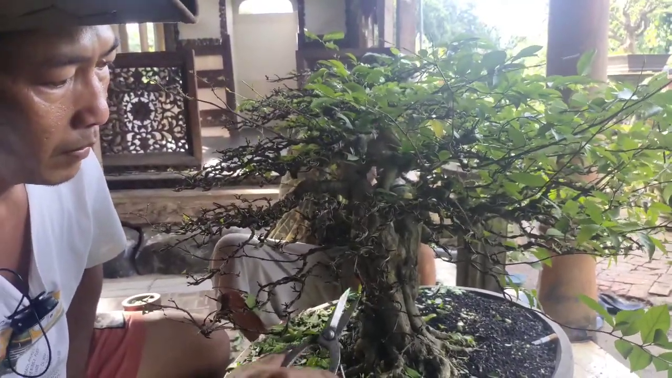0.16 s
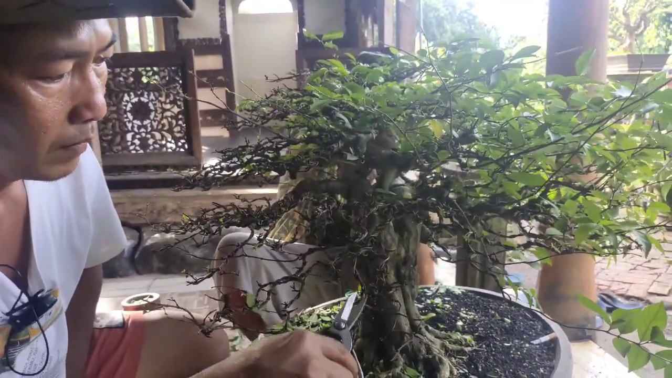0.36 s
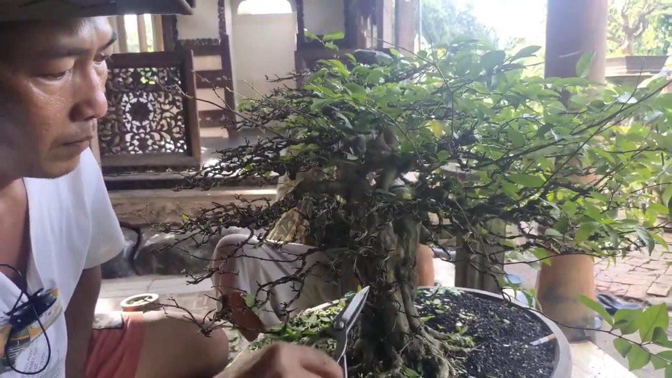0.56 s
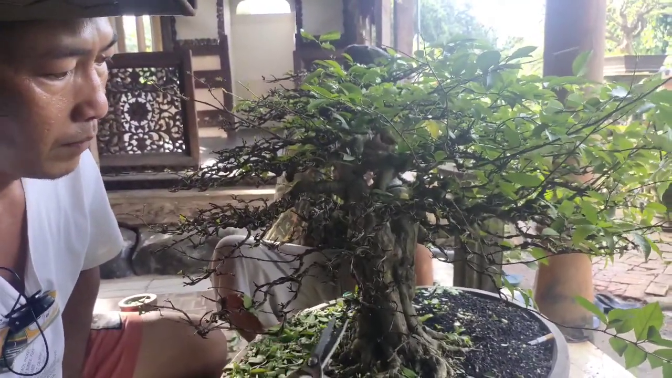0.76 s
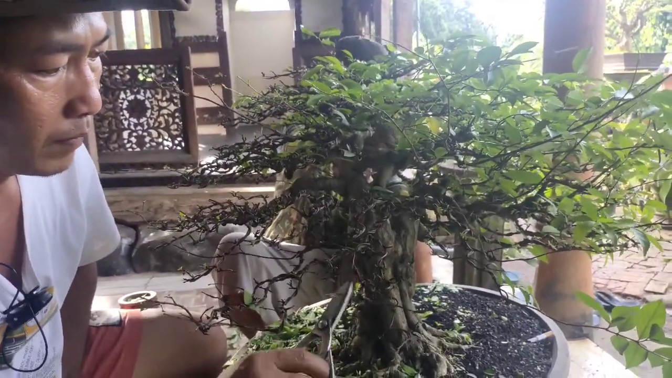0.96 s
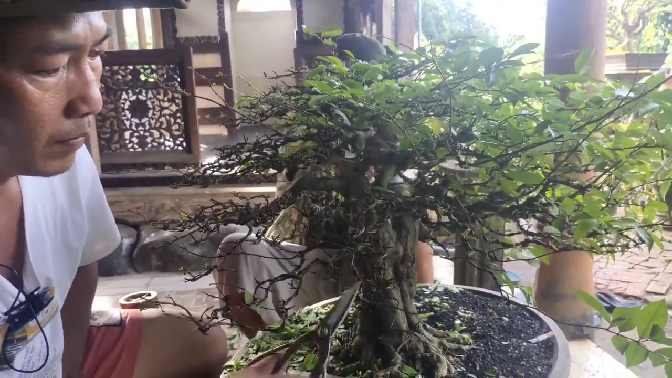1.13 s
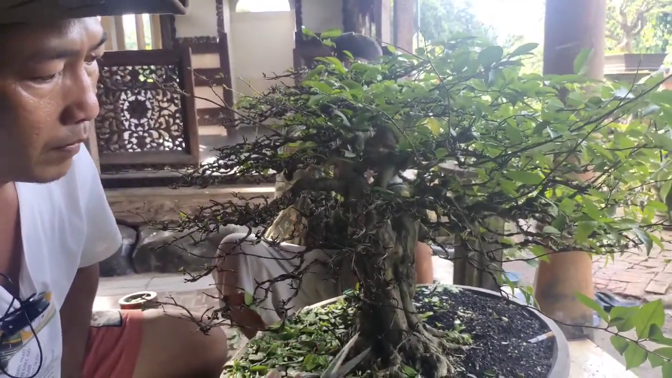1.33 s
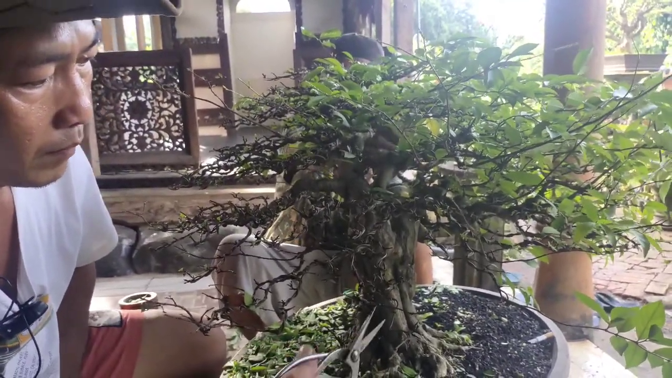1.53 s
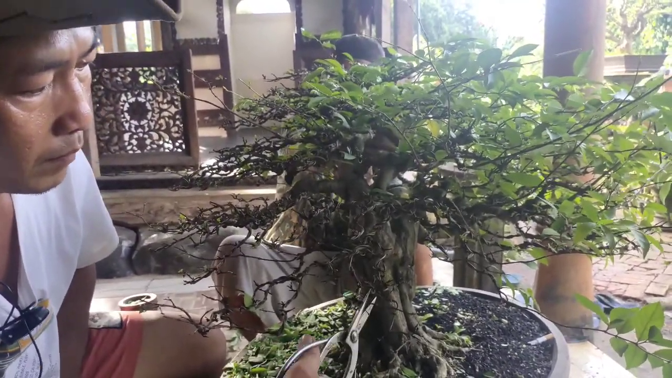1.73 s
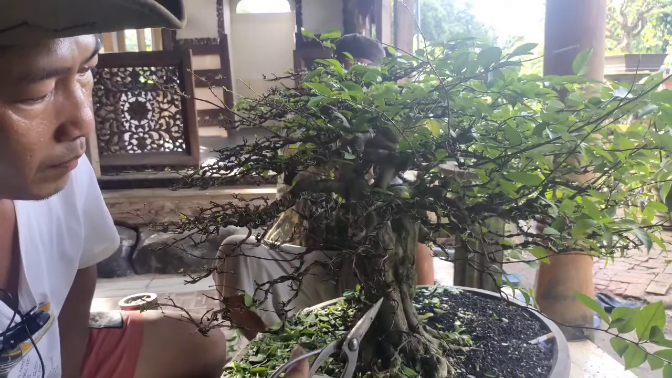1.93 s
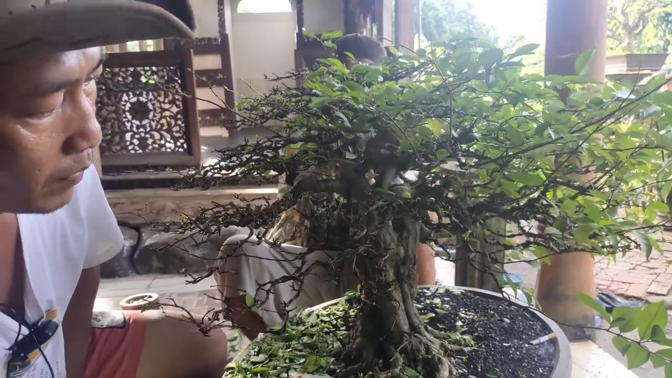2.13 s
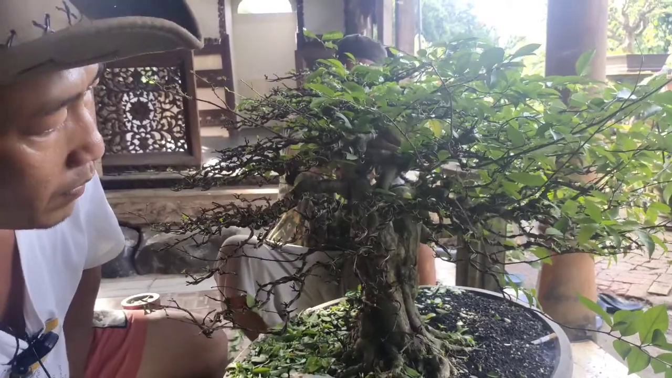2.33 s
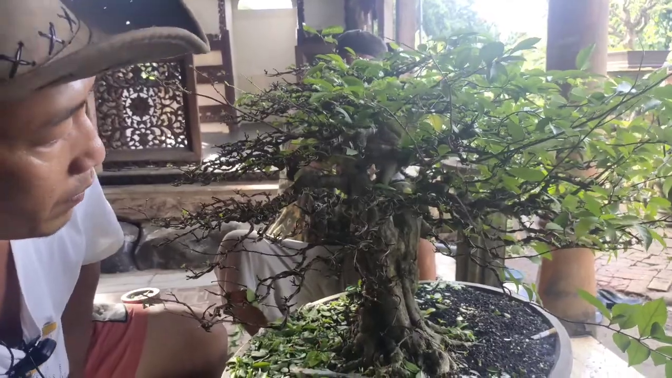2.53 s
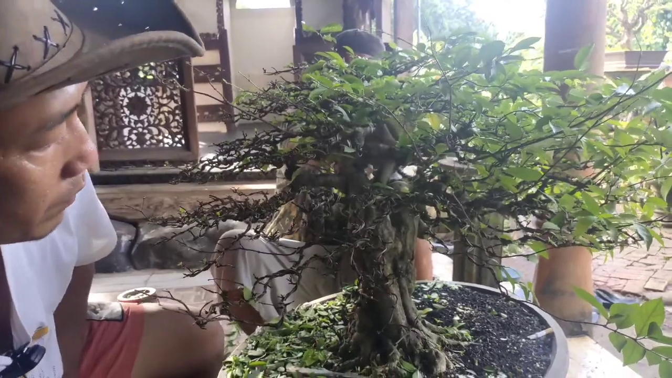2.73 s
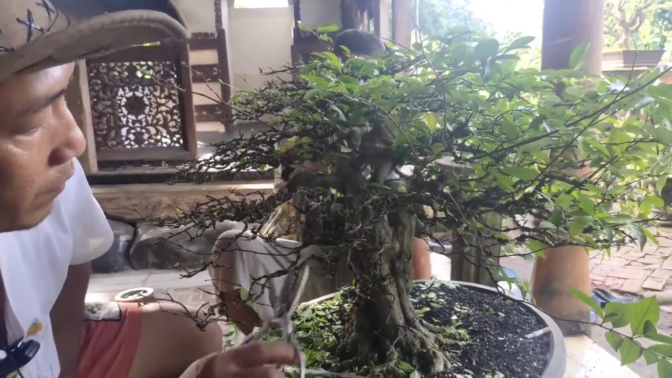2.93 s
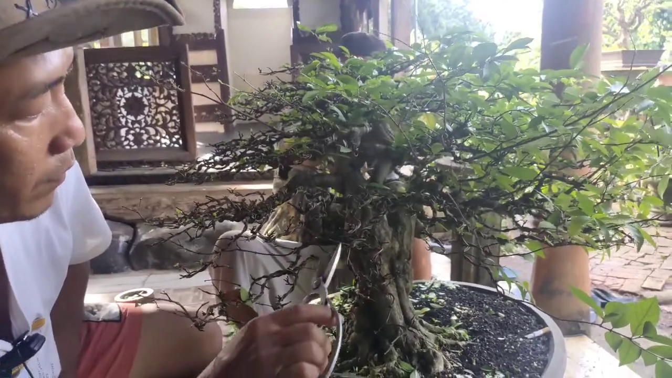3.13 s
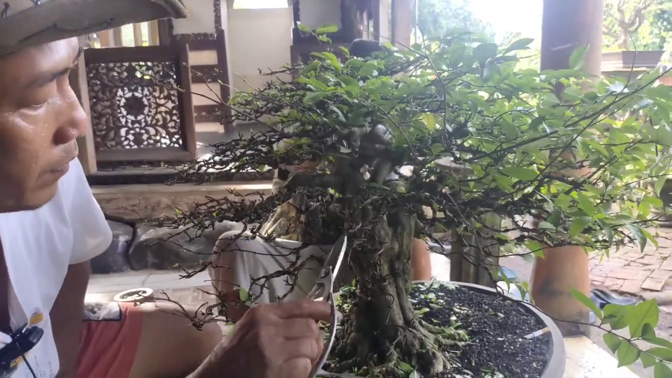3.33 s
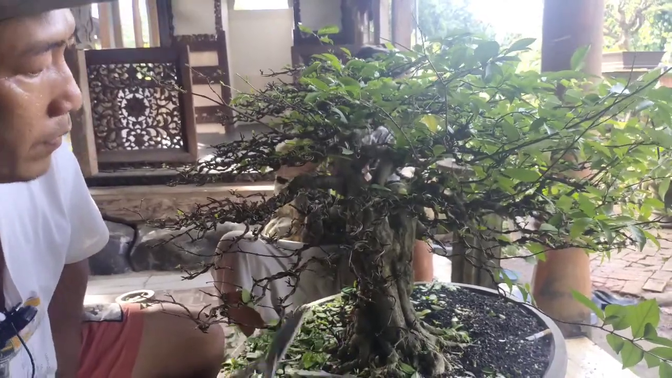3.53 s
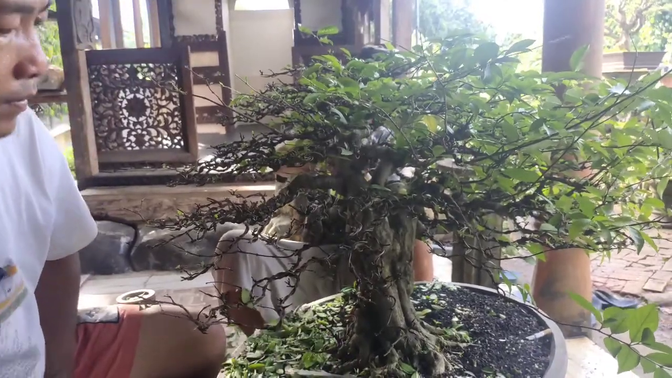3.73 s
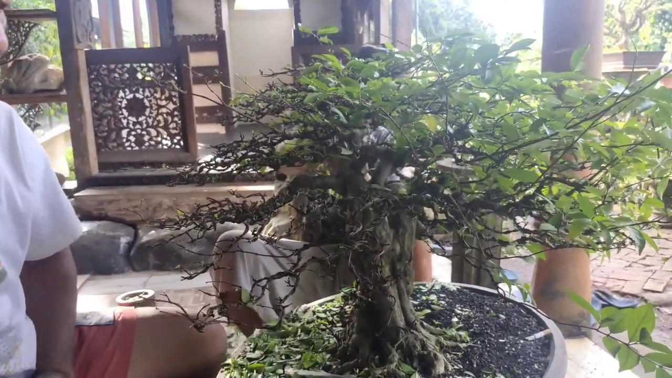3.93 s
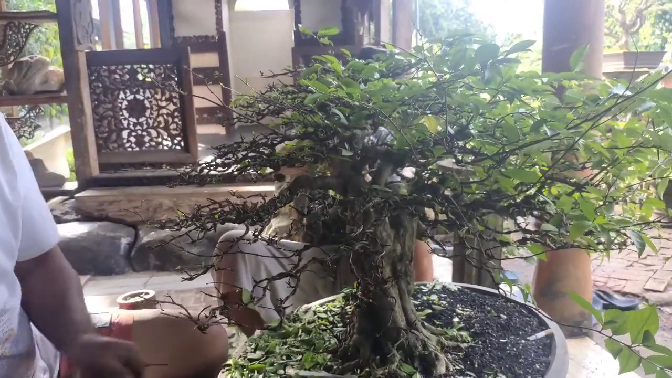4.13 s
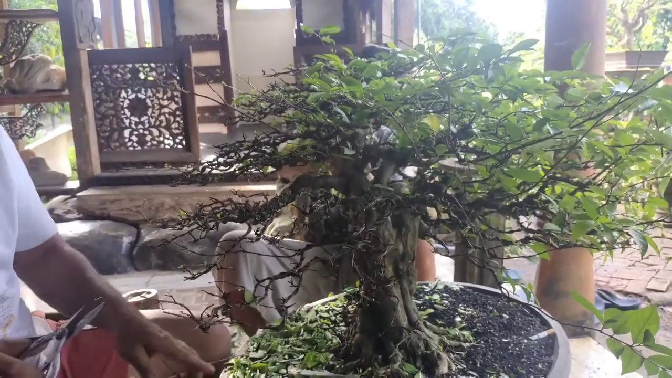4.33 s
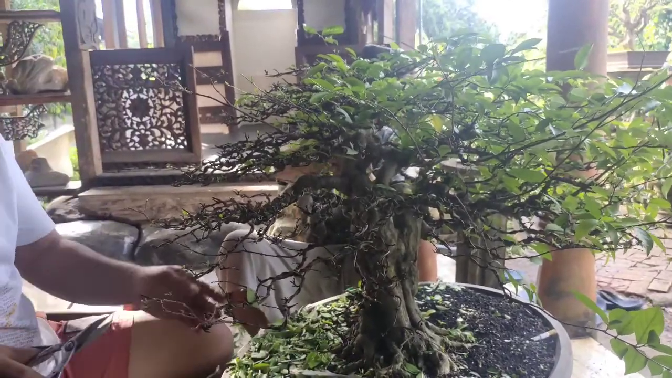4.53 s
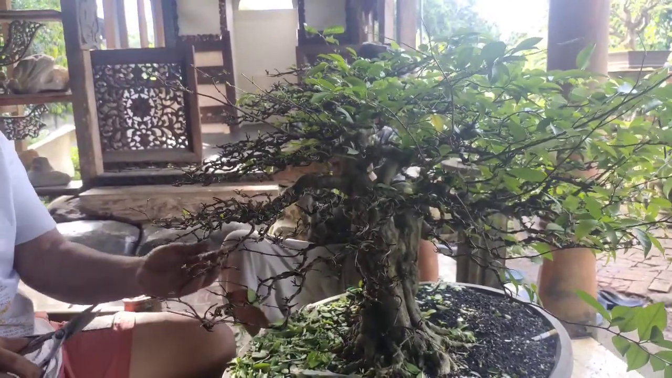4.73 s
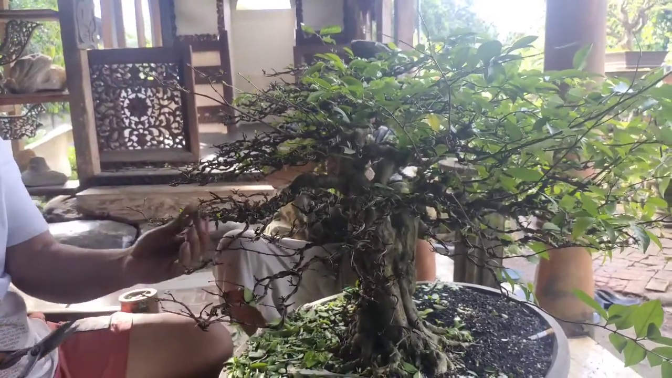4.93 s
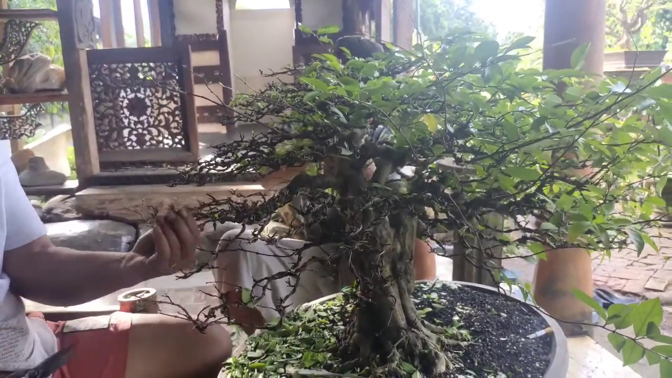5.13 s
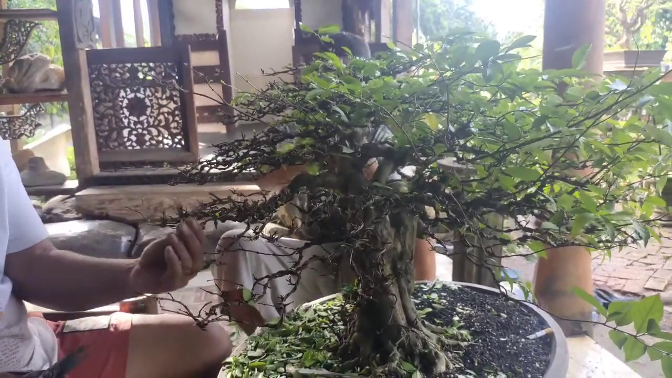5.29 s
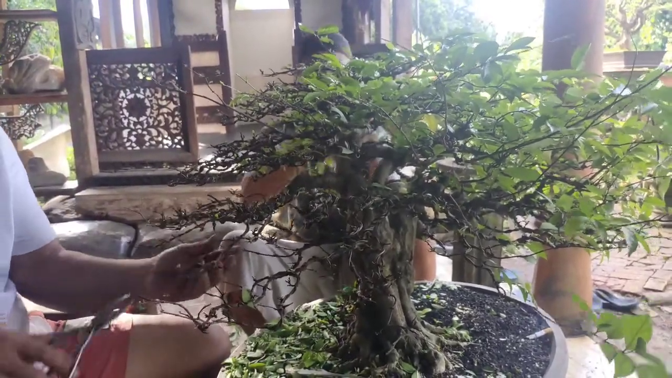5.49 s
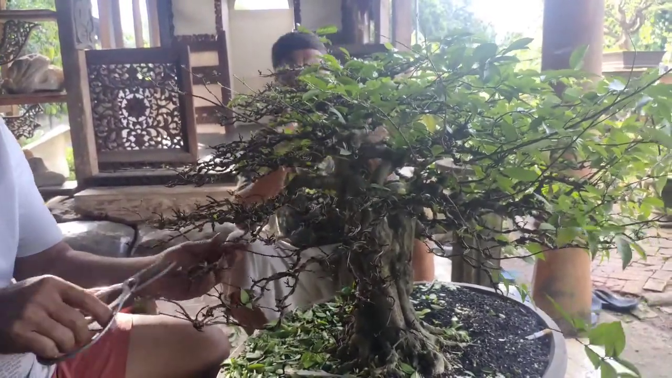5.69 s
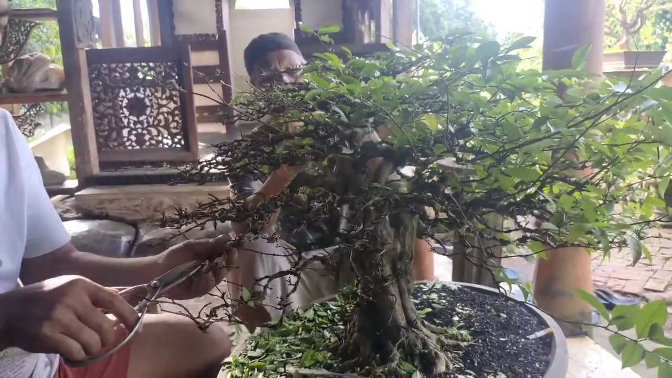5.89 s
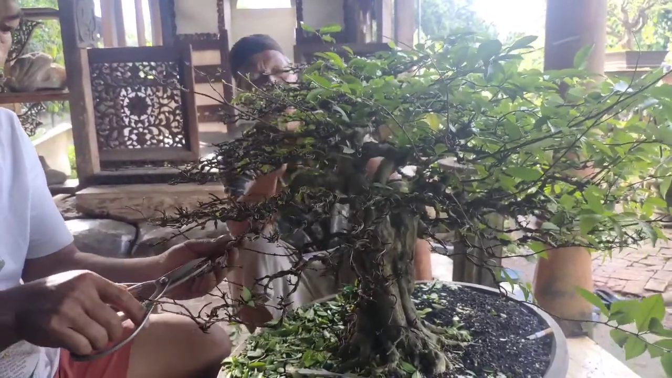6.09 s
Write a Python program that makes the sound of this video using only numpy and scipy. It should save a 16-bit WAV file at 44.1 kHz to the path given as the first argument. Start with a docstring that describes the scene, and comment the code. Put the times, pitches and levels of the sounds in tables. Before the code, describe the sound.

Five sharp metallic scissor snips at irregular gaps, small twig cracks and leaf ticks between, over a distant idling engine that fades into a swelling road rush.

```python
"""The end of a cut rings out at once, then steel scissors snip on at a small potted tree on a tiled veranda.
The microphone is close. Each cut is a noisy crack of wood, a grind of the edges and a few damped blade tones.
Twigs and leaves tick in short noise bursts between the cuts; soft bumps and faint high spots are noise swells.
Far off an engine, made of firing pulses, idles and fades; the street hums in drifting noise bands,
and the tyre noise of a vehicle slowly draws near. A noise suppressor and a dull microphone take it all in."""
import sys
import numpy as np
from scipy import signal
from scipy.fft import rfft, irfft
from scipy.io import wavfile
from scipy.ndimage import uniform_filter1d

SR = 44100
rng = np.random.default_rng(int(sys.argv[2]) if len(sys.argv) > 2 else 0)


def generate_wav(signal):
    """Clip the signal to [-1, 1] and save it as 16-bit WAV at the path in sys.argv[1]."""
    frames = np.transpose(np.atleast_2d(signal))
    scaled = np.clip(frames, -1, 1) * 32767
    pcm = np.round(scaled).astype(np.int16)
    wavfile.write(sys.argv[1], SR, pcm)


N = 275665
TIME = np.arange(N) / SR


def gain_of(db):
    """Decibels to amplitude."""
    return 10 ** (np.asarray(db) / 20)


def evened(x):
    """Scales to rms 1."""
    return x / np.sqrt(np.mean(x ** 2) + 1e-20)


def with_energy(x, seconds):
    """Gives a short sound the energy of a steady sound of rms 1 lasting that many seconds."""
    return x * np.sqrt(seconds * SR) / np.linalg.norm(x)


def read(points, hz):
    """Reads a spectrum on a log-frequency axis."""
    point_hz, value = np.transpose(points)
    return np.interp(np.log(hz + 1), np.log(point_hz + 1), value)


def curve(rows):
    """Reads a time curve at every sample."""
    return np.interp(TIME, *np.transpose(rows))


def add(mix, s, sound):
    """Mixes a sound in at time s, which may lie before zero."""
    start = round(s * SR)
    sound = sound[max(-start, 0):]
    part = mix[max(start, 0):][:len(sound)]
    part += sound[:len(part)]


def colour(x, points):
    """Gives a steady sound a spectrum."""
    hz = np.fft.rfftfreq(len(x), 1 / SR)
    return irfft(rfft(x) * gain_of(read(points, hz)), len(x))


def causal(x, points, size=2048):
    """Gives a click a spectrum by a minimum-phase filter, without blurring its attack."""
    hz = abs(np.fft.fftfreq(size, 1 / SR))
    log_gain = np.log(gain_of(read(points, hz)))
    taps = np.fft.ifft(np.exp(np.conj(signal.hilbert(log_gain)))).real
    return signal.fftconvolve(x, taps[:size // 2])[:len(x)]


def snips():
    """In every cut the edges bite the bark just before the blades meet."""
    # The blades meet. Each row: start in seconds, level in dB, room level in dB that each part shifts,
    # crack of the wood in dB against the cut's level.
    cuts = [(-.03, -17, 5, -22.5), (0.3421, -34, 12, -17), (.5513, -40, 15, -31.5),
            (0.584, -16.5, 2.5, -24.5), (1.1119, -13, 2.5, -25.5), (1.557, -50, 7, -33),
            (1.842, -52.5, 1, -27), (1.969, -10.5, 1.5, -29), (3.4394, -13.5, 3.5, -21.5),
            (4.5904, -53, 9.5, 9.5)]
    bite_ahead_s, bite_db = 0.004, -40.5  # bite level against the cut's level
    out = np.zeros(N)
    for s, db, room_db, crack_db in cuts:
        bite = twig(db + bite_db, treble_db=9.5, decay=.003, room_db=2.0)
        add(out, s - bite_ahead_s, bite)
        add(out, s, snip(db, room_db, crack_db))
    return out


def snip(db, room_db, crack_db, rise=0.00023, span=0.0014):
    """The twig parts, the edges grind and the blades ring for a few milliseconds."""
    # Steel blades, damped by the hand. Each row: pitch in Hz, relative level in dB, decay t60 in seconds.
    blades = [(3330, -17, .012), (4040, -15, .015), (4480, -17, .014), (4880, -18, .015), (5440, -4, .013),
              (6200, -5, .011), (6620, -4, .010), (7000, 0, .012)]
    # The edges grind past each other. Each row: frequency in Hz, relative level in dB.
    grind_tone = [(1000, -43), (2700, -29.5), (3900, -13), (4900, -9), (5500, -11), (6300, 5.5),
                  (7100, -2.5), (8000, -15)]
    t = np.arange(SR // 10) / SR
    ring = np.zeros(len(t))
    for k, (hz, level, t60) in enumerate(blades):
        phase = np.pi * k * k / 2
        ring += gain_of(level - 60 * t / t60) * np.sin(2 * np.pi * hz * t + phase)
    ring *= 1 - np.exp(-t / rise)
    grind = causal(rng.standard_normal(len(t)) * np.exp(-t / .0005), grind_tone)
    ring = gain_of(db) * with_energy(ring, span)
    grind = gain_of(db) * with_energy(grind, span)
    # the flat blades beam their ring at the microphone; the grinding spreads all round the veranda
    steel = veranda(.85 * ring, room_db - 4) + veranda(.55 * grind, room_db + 4)
    crack = twig(db + crack_db, treble_db=1.5, decay=0.0019, room_db=room_db + 10.0)
    return steel + crack


def twig(db, treble_db, decay, room_db, grain_db=5.0, uneven_db=4.0, count=28):
    """Fibres give way in a quick, dying burst of uneven clicks; a clean break is brighter than a knock."""
    # Dry wood. Each row: frequency in Hz, relative level in dB.
    wood = [(100, -30), (300, -4.5), (600, 6.5), (1000, 5.5), (1450, 4.5), (2200, 1.5), (2800, -1.5),
            (3400, -5), (5300, 1), (7000, -6), (8000, -17), (15000, -33)]
    t = np.arange(SR // 10) / SR
    grain = np.minimum(rng.exponential(1, len(t)), 4)
    fibres = rng.standard_normal(len(t)) * gain_of(grain_db * grain)
    # no two twigs resonate alike
    own = list(zip(np.geomspace(400, 7000, count), uneven_db * rng.standard_normal(count)))
    burst = causal(causal(fibres * np.exp(-t / decay), wood), own)
    burst = with_energy(burst, decay)
    burst = causal(burst, [(1800, 0.0056), (4000, treble_db)])
    return veranda(gain_of(db) * burst, room_db)


def twigs():
    """Twigs crack and knock; loud ones are close to the microphone and so drier."""
    # Each row: start in seconds, level in dB, treble against the body in dB, decay time in seconds.
    cracks = [(.334, -60.5, 12, 0.026), (1.6483, -47.5, -10, 0.019), (1.6938, -44.5, -17.5, 0.007),
              (2.0984, -44, -8, 0.0075), (2.5768, -51.5, -22, 0.0062), (2.685, -49, -13, .005),
              (2.9429, -44, -10, .0055), (3.0074, -43.5, -14.5, 0.0055), (3.4311, -40, -0.5, 0.0072),
              (3.4615, -37.5, -4, 0.0074), (3.5198, -37, -8, 0.0027), (3.5532, -36, 0.5, 0.00073),
              (3.5906, -42, -7, 0.0042), (3.6295, -54, 7, 0.0026), (4.473, -49, -16, 0.0052),
              (4.5907, -42, -1.5, 0.0024), (5.613, -42, -19, 0.0088), (5.704, -60.5, 6.5, 0.0051),
              (5.9739, -43.5, -17.5, 0.0045)]
    usual_db, usual_room_db, drier_per_db = -44.5, 9.5, 0.9  # room dB lost per dB above the usual level
    out = np.zeros(N)
    for s, db, treble_db, decay in cracks:
        room_db = usual_room_db - drier_per_db * max(db - usual_db, 0)
        add(out, s, twig(db, treble_db, decay, room_db))
    return out


def leaves(spread_db=3.5):
    """Leaves and fine shoots tick at random while a hand moves among them."""
    # Each row: start in seconds, end in seconds, middle level in dB, ticks a second,
    # treble against the body in dB.
    brushes = [(1.645, 1.741, -60.5, 56, -4), (2.577, 2.758, -60.5, 110, -9.5),
               (2.89, 3.09, -60, 60, -10.5), (3.447, 3.523, -53.5, 60, -6), (3.52, 3.72, -59.5, 60, -7),
               (3.98, 4.198, -62.5, 184, -3), (4.421, 4.561, -67.5, 80, -0.5), (4.595, 4.68, -62.5, 90, -3),
               (5.556, 6.25, -63, 45, -4)]
    out = np.zeros(N)
    for start, end, db, rate, treble_db in brushes:
        ticks = round((end - start) * rate)
        for place, size in rng.random((100, 2))[:ticks]:
            tick = twig(db + spread_db * (2 * size - 1), treble_db, decay=0.0045, room_db=9)
            add(out, start + place * (end - start), tick)
    return out


def veranda(sound, room_db, early_db=-17, early_t60=0.11, late_db=-19):
    """The direct sound, quick scatter off the pot and floor, and a tail under the roof."""
    # Tail of the veranda. Each row: frequency in Hz, decay t60 in seconds.
    tail_t60 = [(300, 0.37), (1400, 1), (3500, .45), (7000, .38)]
    t = np.arange(SR * 3 // 5) / SR
    early, late = rng.standard_normal((2, len(t))) * (1 - np.exp(-(t / .005) ** 2))
    early *= gain_of(-60 * t / early_t60)
    hz, at, z = signal.stft(late, SR, nperseg=256)
    z = z * gain_of(-60 * at / read(tail_t60, hz)[:, None])
    late = signal.istft(z, SR, nperseg=256)[1][:len(t)]
    echoes = gain_of(early_db) * evened(early) + gain_of(late_db) * evened(late)
    echoes *= gain_of(room_db) / np.sqrt(len(t))
    echoes[0] = 1  # the direct sound
    return signal.fftconvolve(sound, echoes)


def swells(rows, width):
    """Narrow bands of noise that swell and fade; width is a share of the pitch."""
    out, hz = np.zeros(N), np.fft.rfftfreq(SR, 1 / SR)
    t = np.arange(SR) / SR - .5
    for s, db, half, centre in rows:
        shape = np.exp(-.5 * ((hz / centre - 1) / width) ** 2)
        band = irfft(rfft(rng.standard_normal(SR)) * shape, SR)
        band *= np.exp(-.5 * (t / half) ** 2)
        add(out, s - .5, gain_of(db) * with_energy(band, half))
    return out


def bumps():
    """Soft bumps as the gardener shifts about, each a low swell of noise."""
    # Each row: middle in seconds, level in dB, half length in seconds, pitch in Hz.
    shifts = [(2.6, -64.5, 0.26, 158.6), (3.3, -66.5, .06, 164), (3.68, -61.5, 0.064, 200),
              (3.91, -56, .024, 174.7), (4.1, -63, 0.11, 171.6), (4.57, -64, 0.11, 207.5),
              (5.08, -60.5, .06, 210), (5.82, -64.5, 0.12, 140), (6.15, -63, 0.079, 200)]
    return swells(shifts, width=0.26)


def faint_swells():
    """Faint, brief swells of narrow noise near 2.2 kHz."""
    # Each row: middle in seconds, level in dB, half length in seconds, centre in Hz.
    spots = [(.735, -70.5, 0.038, 2130), (1.0, -69, 0.078, 2290), (1.37, -70.5, 0.091, 2244)]
    return swells(spots, width=0.033)


def engine(rough=0.4, smear=0.044):
    """Exhaust pulses, smeared by walls on the way into a drone of close lines, over a low rush."""
    # Its speed creeps up and settles. Each row: time in seconds, firings a second.
    firing = [(0, 24.25), (1.2, 25.6), (2.6, 25.45)]
    # Exhaust, before the distance dulls it. Each row: frequency in Hz, relative level in dB.
    exhaust = [(25, -41), (50, -30), (75, -22.5), (100, -8), (140, -8), (200, 0), (260, 0), (350, 5),
               (450, -7.5), (560, -15.5), (800, -11.5), (1200, -16), (2500, -34)]
    pulses = np.diff(np.floor(np.cumsum(curve(firing)) / SR), prepend=0)
    t = np.arange(SR // 4) / SR
    paths = rng.standard_normal(len(t)) * np.exp(-t / smear)
    shifts = np.exp(1j * np.angle(rfft(paths, N)))  # many paths shift each line's phase
    drone = irfft(rfft(pulses - pulses.mean()) * shifts, N)
    clean = evened(colour(colour(drone, exhaust), [(200, -3.0), (450, -8), (900, -15.0)]))
    rush = wash(exhaust, patchy_db=-1.5, patch_hz=70, patch_s=0.29)
    noisy = evened(colour(rush, [(100, -8.5), (300, -9)]))
    return gain_of(engine_db()) * evened((1 - rough) * clean + rough * noisy)


def engine_db():
    """The idle sinks slowly, then fades fast."""
    start_db, sink_db_per_s = -47.5, 1.84
    fades_s, fade_db_per_s = 2.13, 48
    return start_db - sink_db_per_s * TIME - fade_db_per_s * np.maximum(TIME - fades_s, 0)


def tyres():
    """Tyre noise of the nearing vehicle and of the traffic further off, in drifting noise bands."""
    # Each row: frequency in Hz, relative level in dB.
    tyre_tone = [(300, -12.5), (700, 0), (950, -0.5), (1400, 4), (1800, 3.5), (2200, 9), (2600, -3.5),
                 (3100, -15), (3900, -23), (4750, -9), (5400, -23.5), (7000, -25.5), (9000, -55)]
    return tyres_gain() * wash(tyre_tone, patchy_db=3.0, patch_hz=111.2, patch_s=0.13)


def tyres_gain():
    """Tyre noise grows as one over the distance, screened by a wall at first, over the far traffic."""
    # the vehicle drives straight toward the house
    tyres_db, arrives_s = -52.5, 7.03  # unscreened level one second before it would arrive
    clears_wall_s, clearing_s, wall_db = 3.845, 0.25, 14.5
    far_db = -72
    seconds_away = np.maximum(arrives_s - TIME, .5)
    screened = (1 - np.tanh((TIME - clears_wall_s) / clearing_s)) / 2
    near = gain_of(tyres_db - wall_db * screened) / seconds_away
    return np.hypot(near, gain_of(far_db))


def street():
    """The hum of the street: low noise bands that drift and change in level."""
    # Each row: time in seconds, level in dB.
    street_db = [(0, -54), (1.9, -53.5), (2.4, -57.5), (3.1, -54.5), (3.75, -54.5), (4.05, -50.5),
                 (4.55, -53), (5.0, -47.5), (6.25, -49.5)]
    # Each row: frequency in Hz, relative level in dB.
    street_tone = [(60, -43), (150, -21), (250, -13), (330, -5.5), (400, 1), (500, -4.5), (620, -2.5),
                   (760, -20), (1000, -20), (1600, -31), (3000, -50.5)]
    return gain_of(curve(street_db)) * wash(street_tone, patchy_db=3.5, patch_hz=51.3, patch_s=0.11)


def air():
    """Air and microphone hiss: faint wide noise at an even overall level."""
    # Each row: frequency in Hz, relative level in dB.
    air_tone = [(20, 1.5), (100, 3.5), (600, 6), (1200, -7.5), (3000, -9), (5000, -4), (7000, -2),
                (8000, -15), (15000, -20.5)]
    return gain_of(-66.5) * wash(air_tone, patchy_db=2.34, patch_hz=200, patch_s=.08)


def wash(tone, patchy_db, patch_hz, patch_s, size=2048):
    """Distant noise whose bands swell and sink in drifting patches."""
    hop = size // 4
    hz, _, z = signal.stft(rng.standard_normal(N), SR, nperseg=size, noverlap=size - hop)
    # random levels over frequency and time, blurred to the patch size
    field = np.fft.fft2(rng.standard_normal(z.shape))
    across = np.fft.fftfreq(z.shape[0], hz[1])[:, None]
    along = np.fft.fftfreq(z.shape[1], hop / SR)
    blur = np.exp(-np.pi * ((across * patch_hz) ** 2 + (along * patch_s) ** 2))
    patches = evened(np.fft.ifft2(field * blur).real)
    z = z * gain_of(read(tone, hz)[:, None] + patchy_db * patches)
    return evened(signal.istft(z, SR, nperseg=size, noverlap=size - hop)[1][:N])


def scene():
    """The pruning in front of the far sounds of the street."""
    mix = snips() + twigs() + leaves() + bumps() + faint_swells()
    mix += engine() + tyres() + street() + air()
    return mix[None]


def suppress(x, depth_db=13.0, knee_db=1.5, memory=0.016, size=1024):
    """Turns down each band while it is weak: faint sounds come through in blotches and tails end early."""
    # Whatever lies under this line is turned down.
    # Each row: frequency in Hz, threshold in dB against white noise of rms 1.
    gate = [(100, -47), (200, -45.5), (400, -41), (700, -49), (1000, -46), (2000, -49.5), (3000, -60.5),
            (7000, -55.5)]
    hop = size // 4
    hz, _, z = signal.stft(x, SR, nperseg=size, noverlap=size - hop)
    power = uniform_filter1d(abs(z) ** 2 * size * 2 / 3, size=3, axis=0)
    keep = np.exp(-hop / SR / memory)
    recent = abs(signal.lfilter([1 - keep], [1, -keep], power))
    over_db = 10 * np.log10(recent + 1e-20) - read(gate, hz)[:, None]
    z = z * gain_of(-depth_db * (1 - np.tanh(over_db / knee_db)) / 2)
    return signal.istft(z, SR, nperseg=size, noverlap=size - hop)[1][:N]


def record(dry, hiss_db=-92):
    """Noise suppression, the dull top of the microphone, slight overload, hiss, then the band limit."""
    # The microphone loses the top octave. Each row: frequency in Hz, response in dB.
    microphone = [(7000, -1.5), (7350, -6), (7650, -19.5), (8000, -35), (8400, -58), (15000, -77.5)]
    ceiling, edge_hz = .8, 15500
    heard = causal(suppress(dry[0]), microphone)
    heard = ceiling * np.tanh(heard / ceiling)
    heard = colour(heard, [(9500, -0.5), (13000, -15.5)])
    heard += gain_of(hiss_db) * rng.standard_normal(N)
    band_limit = signal.firwin(511, edge_hz, window=("kaiser", 9), fs=SR)
    return signal.oaconvolve(heard, band_limit, "same")[None]


dry = scene()
out = record(dry)
generate_wav(out)
```